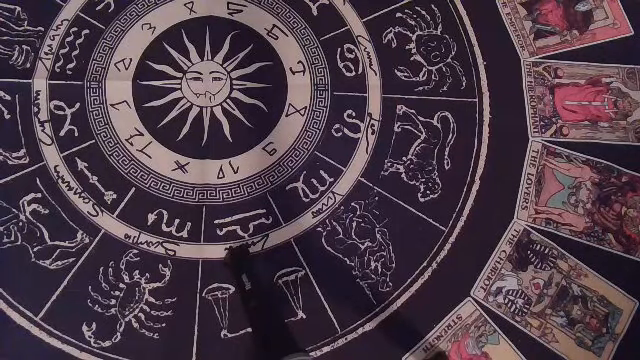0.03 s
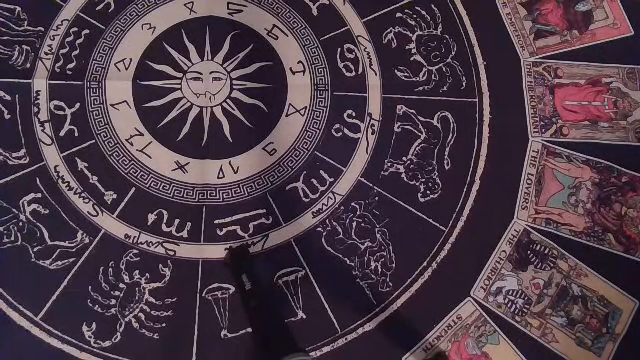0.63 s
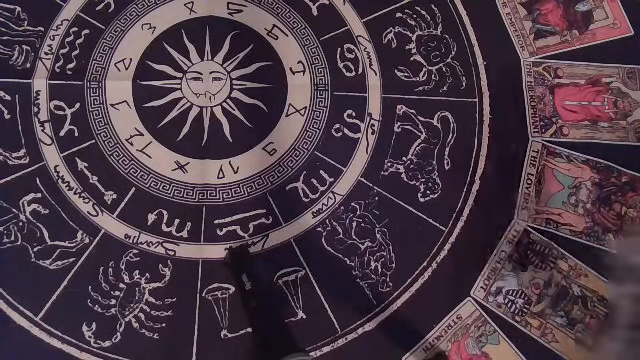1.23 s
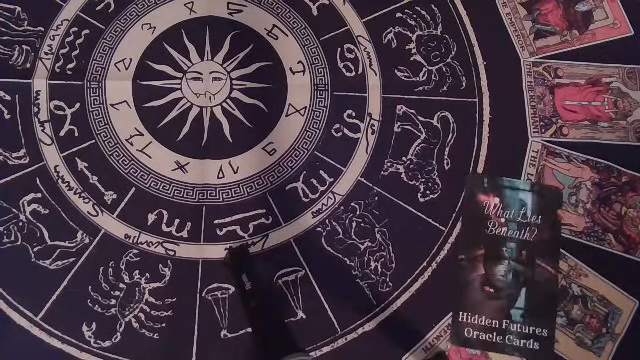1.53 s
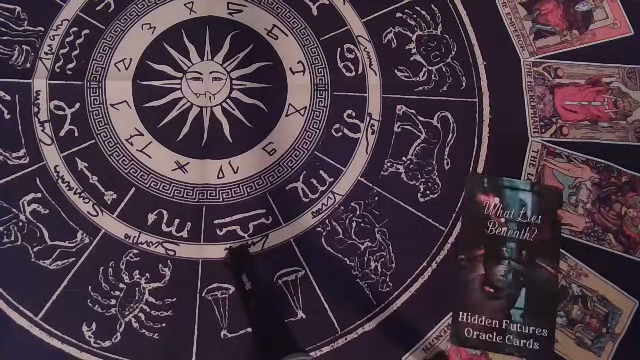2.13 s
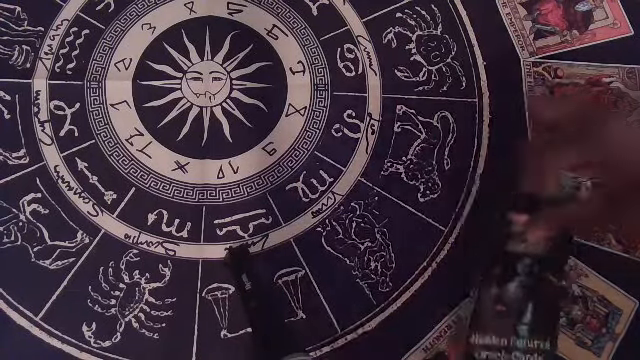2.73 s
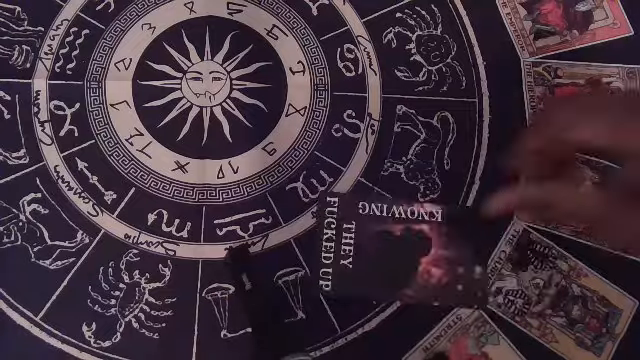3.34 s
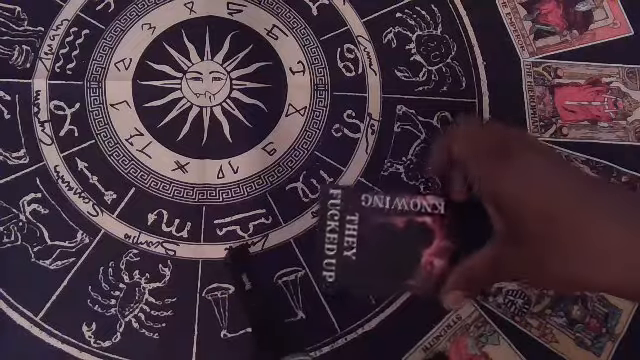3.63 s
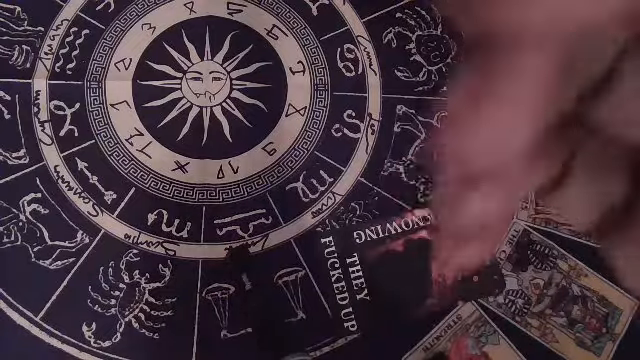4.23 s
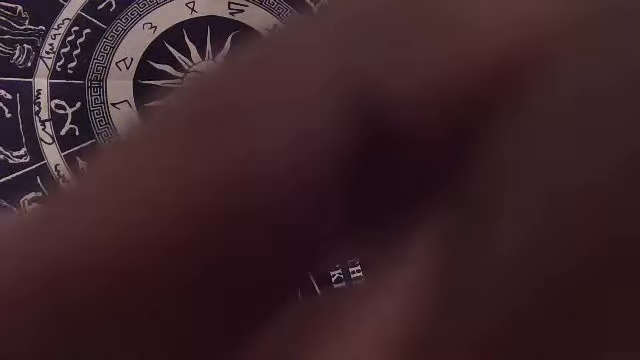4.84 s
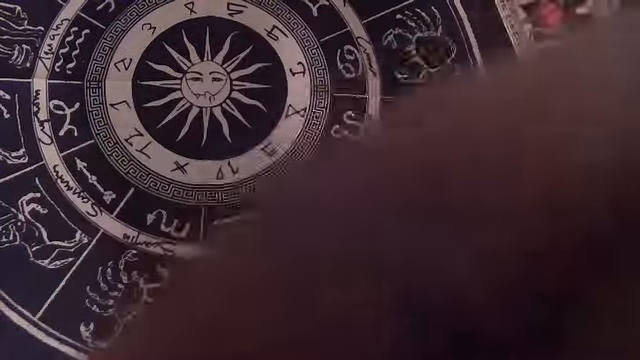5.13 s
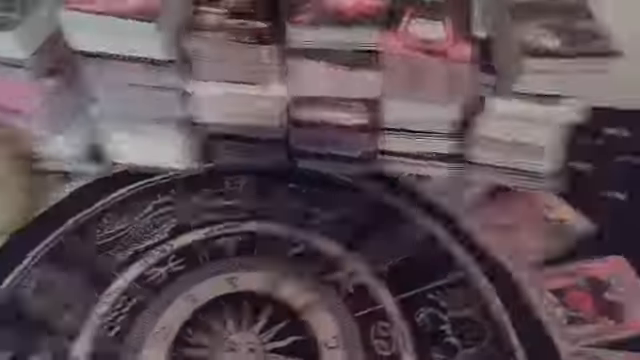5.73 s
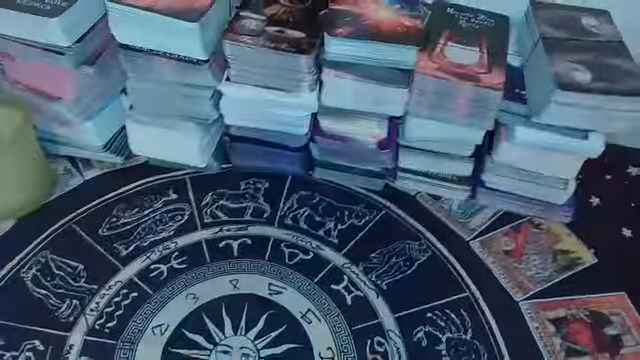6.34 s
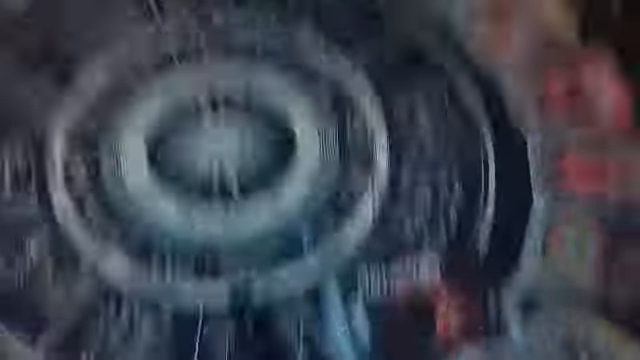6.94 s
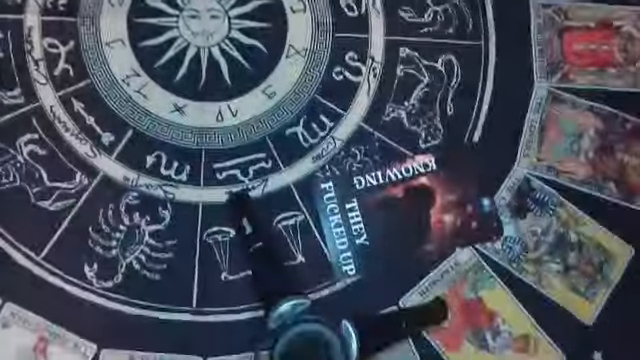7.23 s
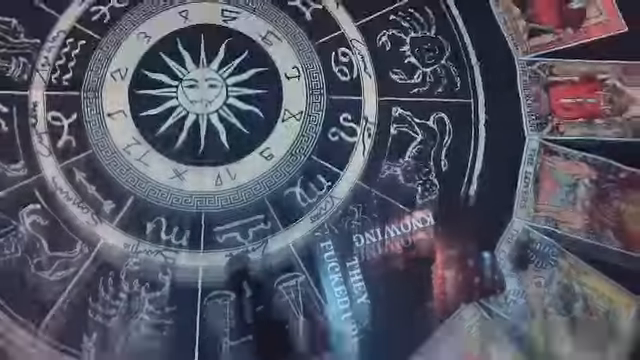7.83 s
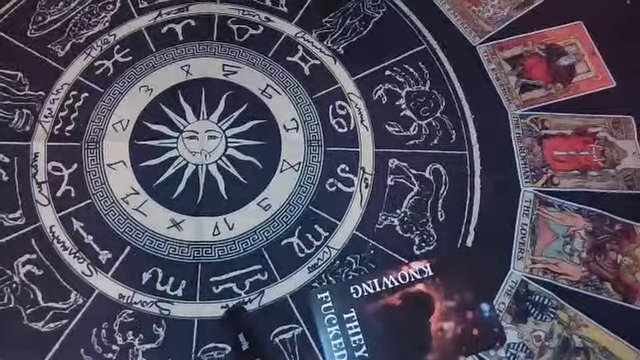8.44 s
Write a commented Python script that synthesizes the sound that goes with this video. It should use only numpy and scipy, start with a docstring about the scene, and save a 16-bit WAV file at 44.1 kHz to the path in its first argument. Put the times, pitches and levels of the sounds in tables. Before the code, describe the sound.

In a small, quiet room with a faint hum, a deck of cards is shuffled in four light strokes and set down, and a card is softly drawn and laid on a cloth-covered table. Then fingers rub right at the microphone as its stand is tilted. A heavy knock briefly overloads the sound, a lamp button clicks twice, and the metal arm swings with a run of loud, ringing knocks.

```python
"""A stand holding microphone and lamp is tilted, its lamp button clicked and its arm swung back. Fingers
rub and joints knock right at the microphone, through its housing, hard enough to overload the
preamplifier, which jams for a moment at the first heavy blow. Before that, at a cloth-covered table,
a deck of cards is shuffled in four strokes and set down, and one card is drawn and laid down.
One microphone hears it all, in a small, quiet room that hums behind."""
import sys
import numpy as np
from scipy import signal
from scipy.fft import rfft, irfft, next_fast_len
from scipy.io import wavfile

SR = 44100
rng = np.random.default_rng(int(sys.argv[2]) if len(sys.argv) > 2 else 0)


def output_pcm(signal):
    """Save a mono or channel-first signal as 16-bit PCM at the path in sys.argv[1].

    Samples are clipped to [-1, 1] before scaling.
    """
    pcm = np.clip(np.atleast_2d(signal).T, -1, 1) * 32767
    wavfile.write(sys.argv[1], SR, np.round(pcm).astype(np.int16))


N = 374449
TIME = np.arange(N) / SR


# the microphone housing's resonances, a list each for ring, thud and tick: pitch_hz, width_hz, gain_db
HOUSING_MODES = ([(1242, 147, 1.5), (1507.5, 190, 0), (1036, 180, -12), (1753, 120, -10), (2239, 280, -13)],
                 [(66, 52, -7), (165, 150, -2.5), (430, 170, 1.5), (585, 205, 2), (872, 61, -2)],
                 [(4200, 840, -0.5), (5500, 520, 3.5), (7370, 930, 2.5), (10500, 2000, -16.5),
                 (14000, 2000, -17)])
def stand():
    """Handling reaches the capsule through the housing and leaves the metal arm ringing."""
    contacts = stand_contacts()
    knocks = blows(contacts, HOUSING_MODES, chatter=.059, scuff=.6, chatter_s=.0018,
                   hard_hz=3800, detune=.036, vary_db=2.5)
    button = lamp_button()
    rubs = finger_rubs()
    ring = arm_ring(contacts)
    # rubbing sets the arm singing too
    singing = resonate(rubs, [(1520, 9, -5), (1260, 14, -13), (571, 10, -7)], detune=.002, vary_db=1)
    direct = knocks + button + from_db(-1) * rubs + singing
    reflections = from_db(-33) * room(direct, low_t60=.3, high_t60=.25, high_db=-3)
    return direct + ring + arm_ring_through_jam() + reflections


# the joints knocking, right at the microphone, and at 6.27 s a finger touching the lamp's button: start_s,
# ring_db, thud_db, tick_db
JOINT_KNOCKS = [(4.8456, -33, -60, -55), (5.5482, -16.5, -29.5, -55), (5.572, -17.5, -47, -60),
                (5.6049, 11, -15, 5.5), (5.6994, -28.5, -46, -41), (6.054, -21, -36, -33),
                (6.0965, -19, -24.5, -27.5), (6.1692, -29, -45, -68), (6.2718, -35, -45, -40.5),
                (6.6273, -12, -43, -26), (6.6353, -5.5, -20, -4), (6.6478, 6.5, -17, -8),
                (6.6604, -9, -23, -32), (6.6853, .5, -5, -17.5), (6.71, -7.5, -30, -23),
                (6.7287, -7.5, -11.5, -40), (6.7582, -2, -10, -25), (6.7687, -3.5, -10, -27),
                (6.8203, -20.5, -28.5, -20.5), (6.9474, -21.5, -19.5, -43), (6.9887, 3, -8, -15),
                (7.1083, 10.5, -18, -9.5), (7.1162, 7.5, -4.5, -9), (7.1448, -7.5, -42, -18.5),
                (7.1576, -17, -35, -25), (7.245, -13.5, -32, -24), (7.2578, -11, -43, -20),
                (7.2905, -17, -29, -46), (7.3753, -30, -35, -36), (7.4262, -30, -34, -36.5),
                (7.4484, -9, -28.5, -21.5), (7.558, -7, -17.5, -45), (7.6435, -17.5, -40, -30.5),
                (7.7259, -18, -24, -66), (7.7887, -27, -28, -70), (7.809, -3, -13, -36),
                (8.1505, -38, -52, -75), (8.2512, -34.5, -51, -59), (8.397, -28, -32, -57.5)]
SWING_START_S, SWING_FASTEST_S, SWING_END_S = 6.62, 7.15, 8.45
FIRM_DB, TOUCH_LEAD_S, HEAVY_DB, REBOUND_S = -17.2, .011, -5, .0028
HOUSING_RING_HZ, HARDNESS_OCTAVES_PER_DB, GRIPPED_UNTIL_S, GRIP_OCTAVES = 1510, .0053, 6.5, -.18
def stand_contacts():
    """Every blow on the stand: start_s, ring_db, thud_db, tick_db, pitch_hz."""
    # while the arm swings, its slack closes with a light touch just before each firm knock
    touches = [(s - TOUCH_LEAD_S, -30, -35, -45) for s, ring, *_ in JOINT_KNOCKS
               if ring > FIRM_DB and s - TOUCH_LEAD_S > SWING_START_S]
    # a heavy knock takes up the play of the joint and strikes again, more softly
    rebounds = [(s + REBOUND_S, ring - 2, thud, tick - 4) for s, ring, thud, tick in JOINT_KNOCKS
                if ring > HEAVY_DB]
    # as the arm starts to move, a looser part clanks twice at a lower pitch
    contacts = [(6.6387, -3.5, -17, -33, 890), (6.6507, -2.5, -11, -34, 890)]
    hits = list(JOINT_KNOCKS) + touches + rebounds + chatter_to_stop() + bumps_and_ticks()
    for s, ring, thud, tick in hits:
        # a harder contact rings higher; a gripping hand lowers the ring
        octaves = HARDNESS_OCTAVES_PER_DB * (tick - ring) + GRIP_OCTAVES * (s < GRIPPED_UNTIL_S)
        contacts.append((s, ring, thud, tick, HOUSING_RING_HZ * 2 ** octaves))
    return contacts


def chatter_to_stop(start_s=7.8144, count=6, first_gap_s=.005, slowing=1.2, loss_db=2.4):
    """The arm chatters to a stop, each blow later and weaker."""
    first_blow = np.array([3, -17, -5.5])   # ring_db, thud_db, tick_db
    k = np.arange(count)
    times = start_s + np.cumsum(first_gap_s * slowing ** (k - 1) * (k > 0))
    return [(s, *(first_blow - loss_db * i)) for i, s in enumerate(times)]


# finger bumps (first row), then joint ticks: start_s, end_s, hits_per_s, ring_db, thud_db, tick_db
BUMP_AND_TICK_SPELLS = [(5.46, 5.51, 50, -33, -42, -62), (6.65, 6.73, 60, -19, -27, -35),
                        (6.92, 7.28, 16, -30, -35, -48), (7.58, 7.62, 50, -29, -33, -49)]
def bumps_and_ticks(spread_db=2):
    """Soft finger bumps on the stand, then faint joint ticks while the arm swings."""
    hits = []
    for start, end, per_s, *levels in BUMP_AND_TICK_SPELLS:
        for s in np.arange(start, end, 1 / per_s):
            hits.append((s + rng.random() / per_s, *(levels + spread_db * rng.standard_normal(3))))
    return hits


# resonances of the arm that carries the microphone: pitch_hz, t60_s, gain_db
ARM_MODES = [(42, .25, -42), (73.4, .15, -43), (118, .15, -43.5), (225, .12, -48), (375, .3, -56),
             (571, .6, -50.5), (676, .6, -62), (1085, .45, -56.5), (1265, .13, -34), (1460, .25, -51),
             (1530, .38, -52.5), (1744, .35, -60), (1870, .45, -61), (2487, .35, -66), (3270, .2, -64)]
def arm_ring(contacts, spread_db=3.4):
    """Each jolt leaves the metal arm swaying with a faint, long ring."""
    start_s, ring_db = np.transpose(contacts)[:2]
    onsets = (start_s * SR).astype(int)
    t, ring = TIME[:SR // 2], np.zeros(N)
    for hz, t60, db in ARM_MODES:
        jolts = np.zeros(N)
        jolts[onsets] = from_db(ring_db + db + spread_db * rng.standard_normal(len(onsets)))
        mode = from_db(-60 * t / t60) * np.sin(2 * np.pi * hz * t)
        ring += signal.oaconvolve(jolts, mode)[:N]
    return ring


def arm_ring_through_jam(start_s=5.6994):
    """The arm's ring from the first heavy blow sounds through as the jammed preamplifier briefly frees."""
    modes = [(1250, .2, -45), (3330, .35, -50), (6100, .2, -65)]   # pitch_hz, t60_s, level_db
    t = np.maximum(TIME - start_s, 0)
    return sum(from_db(db - 60 * np.minimum(t / t60, 3)) * np.sin(2 * np.pi * hz * t)
               for hz, t60, db in modes)


# fingers on the table, then on the microphone's stand: start_s, length_s, body_gain_db, hiss_gain_db
FINGER_STROKES = [(3.44, .045, -57, -82), (3.515, .04, -59, -82), (3.73, .055, -57, -82),
                  (4.556, .065, -43.5, -51.5), (4.645, .03, -45, -40), (4.858, .07, -43.5, -53.5),
                  (4.97, .045, -49, -58), (5.09, .033, -43, -43.5), (5.153, .06, -32, -33.5),
                  (5.173, .022, -23.5, -34), (5.256, .045, -38, -39.5), (5.345, .062, -37.5, -46.5),
                  (5.36, .24, -44.5, -68), (5.444, .036, -29.5, -37.5), (5.97, .08, -46.5, -62),
                  (6.05, .035, -35.5, -37.5), (6.06, .11, -37, -43), (6.62, .06, -18.5, -37.5),
                  (6.68, .12, -36, -42), (6.8, .135, -35, -45), (7.28, .07, -39.5, -52),
                  (7.535, .1, -44.5, -53), (7.89, .125, -41, -56.5), (8.25, .14, -55, -62.5)]
# the rubbing's low body and its high hiss: frequency_hz, gain_db
RUB_BODY_SPECTRUM = [(80, -19), (280, -24), (520, -12), (820, -18.5), (1050, -6.5), (1250, 1.5), (1520, -1),
                     (1900, -11), (2250, -14), (2900, -24.5), (4200, -42)]
RUB_HISS_SPECTRUM = [(2300, -26.5), (3300, -8.5), (4700, -12), (5800, 1.5), (7300, 2), (8800, -9.5),
                     (10300, -13), (12000, -17.5), (16000, -20.5)]
# narrow resonances that sing out under the fingers: pitch_hz, width_hz, gain_db
RUB_RESONANCES = [(1250, 110, 1), (1520, 70, 4.5), (2170, 76, 6), (2780, 85, 2), (3460, 210, 3.5),
                  (4160, 220, 5), (5300, 150, 6.5), (6930, 260, 7), (7560, 200, 4.5), (10700, 140, 3.5)]
def finger_rubs(drag_body_db=-53.5, drag_hiss_db=-65):
    """Fingers stick and slip in short strokes, and the joint drags all through the swing."""
    joint_drag = (SWING_START_S, SWING_FASTEST_S, SWING_END_S, drag_body_db, drag_hiss_db)
    strokes = swells(FINGER_STROKES, attack=.33) + [joint_drag]
    return friction(strokes, RUB_BODY_SPECTRUM, RUB_HISS_SPECTRUM, RUB_RESONANCES,
                    slips_per_s=2800, grain_db=3, smooth=.7, flutter_db=1.46, swell=2)


# the lamp's button, on the same stand as the microphone: start_s, ring_db, thud_db, tick_db
LAMP_CLICKS = [(6.1238, -12, -17.5, -17), (6.2998, -6.5, -19, -14.5)]
# its resonances, a list each for ring, thud and tick: pitch_hz, width_hz, gain_db
BUTTON_MODES = ([(1650, 64, 0), (985, 56, -1.5), (1300, 240, -6.5), (2192, 110, -11.5),
                (2835, 51.6, -24.5)], [(345, 260, -4), (521, 220, -2), (680, 85, -1.5)], [(4000, 380, -5),
                (5170, 400, -1), (7050, 330, 1.5), (10700, 1500, -30)])
def lamp_button():
    """The button snaps twice, short and hard."""
    return blows(LAMP_CLICKS, BUTTON_MODES, chatter=.072, scuff=.58, chatter_s=.00089,
                 hard_hz=4014, detune=.006, vary_db=1)


def cards():
    """Cards in the air and on the table, off the microphone, with more of the room around them."""
    packet_rubs, packet_taps = shuffling()
    shuffle = card_slides(packet_rubs) + from_db(.5) * card_taps(packet_taps)
    table = table_taps()
    boom = lowpass(table, 750, order=2)   # the tabletop radiates mostly its lows
    into_room = from_db(-7) * (shuffle + boom) + from_db(-17) * table
    return shuffle + table + room(into_room, low_t60=.36, high_t60=.35, high_db=-.5)


# four shuffle strokes above the table: lift_s, catch_s, land_s, catch_db, land_db
SHUFFLE_STROKES = [(-.06, .0092, .0536, -37, -31), (.268, .3331, .3835, -30, -33.5),
                   (.5967, .6245, .7205, -46, -31.5), (.9467, .9807, 1.0517, -33, -37.5)]
def shuffling(lift_rub_s=.025, release_s=.028, flat_delay_s=.005):
    """A packet is lifted, its edge catches the deck, it slides home and lands."""
    rubs = []   # start_s, fastest_s, end_s, body_gain_db, hiss_gain_db
    taps = []   # start_s, ring_gain_db, thud_gain_db, tick_gain_db
    for lift, catch, land, catch_db, land_db in SHUFFLE_STROKES:
        rubs += [(lift - lift_rub_s, lift, lift + lift_rub_s, -55.5, -58),
                 ((lift + catch) / 2, land, land + release_s, -49.5, -57)]
        taps += [(lift, -45, -47, -47),
                 (catch, catch_db, catch_db - 12, catch_db - 17),
                 (land, land_db - 1, land_db - 4, land_db - 13),   # edge first, then flat
                 (land + flat_delay_s, land_db - 6, land_db + 1.5, land_db - 3.5)]
    return rubs, [tap for tap in taps if tap[0] >= 0]


# single cards sliding off the deck at the table: start_s, length_s, body_db, hiss_db
CARD_STROKES = [(1.22, .08, -56, -58), (1.58, .13, -60.5, -65.5), (1.83, .08, -65, -62),
                (2.595, .08, -61, -68), (2.775, .12, -54.5, -71)]
# the sliding's low body and its high hiss: frequency_hz, gain_db
CARD_BODY_SPECTRUM = [(80, -1), (200, -16), (350, -7), (650, -14), (900, -20.5), (1350, -12.5), (1650, -5),
                      (1950, -12.5), (2500, -18), (3200, -30.5), (4500, -50)]
CARD_HISS_SPECTRUM = [(2500, -20), (3500, 4), (4400, -11), (5500, 2), (7300, 4), (9000, -9), (10800, 1.5),
                      (12500, -11), (16000, -2.5)]
# narrow resonances of the sliding cards: pitch_hz, width_hz, gain_db
CARD_RESONANCES = [(1600, 110, 4.1), (1980, 160, 1.7), (5250, 280, 3), (7000, 330, 2)]
def card_slides(packet_rubs):
    """Card slips over card with a fine, papery grain."""
    strokes = packet_rubs + swells(CARD_STROKES, attack=.42)
    return friction(strokes, CARD_BODY_SPECTRUM, CARD_HISS_SPECTRUM, CARD_RESONANCES,
                    slips_per_s=3000, grain_db=2, smooth=.58, flutter_db=1.7, swell=.99)


# the deck knocked square: start_s, ring_gain_db, thud_gain_db, tick_gain_db
SQUARING_TAP = [(1.2409, -40, -45, -38.5)]
# the deck's resonances, a list each for ring, thud and tick: pitch_hz, width_hz, gain_db
DECK_MODES = ([(1626, 184, 5), (1920, 300, 7), (1120, 250, -5.5), (2600, 600, -16.5)], [(170, 122, -6),
              (358, 107, -1.5), (530, 110, -0.5), (654, 110, -6)], [(3370, 510, 0), (5560, 900, 1.5),
              (7400, 1400, -2), (10700, 1000, -6), (13900, 3000, -10)])
def card_taps(packet_taps):
    """Packets strike the deck, which rings briefly and is then knocked square."""
    return blows(packet_taps + list(SQUARING_TAP), DECK_MODES, chatter=.14, scuff=.4, chatter_s=.002,
                 hard_hz=3070, detune=.039, vary_db=2.5)


# deck and fingers touching the table: start_s, ring_db, thud_db, tick_db
TABLE_TOUCHES = [(1.3204, -29, -35, -47), (1.3318, -37, -46, -35.5), (1.3357, -24, -28.5, -68),
                 (2.9855, -37, -39, -63), (2.9907, -40, -47.5, -72), (3.039, -45.5, -49, -50.5),
                 (3.0795, -45, -57, -48), (3.4514, -49, -57, -77), (3.7548, -45, -54.5, -77)]
# the tabletop's resonances, a list each for ring, thud and tick: pitch_hz, width_hz, gain_db
TABLE_MODES = ([(1123, 120, -1), (1310, 94, 3.5), (1520, 190, -5), (2020, 460, -15)], [(145, 88, -11.5),
               (272, 82, -4.5), (424, 30, 0.5), (580, 70, -6)], [(2330, 910, -3), (3500, 600, -7),
               (5560, 1000, -19), (7250, 1200, -18.5)])
def table_taps():
    """Light blows reach the tabletop through the muffling cloth."""
    return blows(TABLE_TOUCHES, TABLE_MODES, chatter=.092, scuff=.4, chatter_s=.0042,
                 hard_hz=2800, detune=.015, vary_db=2)


def blows(rows, body, chatter, scuff, chatter_s, hard_hz, detune, vary_db):
    """A cushioned push makes a body ring and thud; a dry scuff of the surfaces makes it tick."""
    out, t = np.zeros(N), TIME[:SR // 12]
    ring_modes, thud_modes, tick_modes = body
    ring_hz = np.mean([hz for hz, width, db in ring_modes[:2]])
    click = (t == 0) + 1e-18
    for s, ring_db, thud_db, tick_db, *pitch in rows:
        grit = rng.standard_normal(len(t)) * np.exp(-t / chatter_s)
        # a contact that hardly ticks is a soft one, and its push is dull
        cushion_hz = np.clip(hard_hz * 2 ** ((tick_db - ring_db) / 36), 1600, SR / 4)
        push = lowpass(click + chatter * grit, cushion_hz, order=4)
        grip = pitch[0] / ring_hz if pitch else 1   # where and how it is held shifts the ring
        held_modes = [(hz * grip, width, db) for hz, width, db in ring_modes]
        at = int(s * SR)
        for force, modes, db in [(push, held_modes, ring_db), (push, thud_modes, thud_db),
                                 (click + scuff * grit, tick_modes, tick_db)]:
            part = resonate(force, modes, detune, vary_db)
            out[at:at + len(t)] += (from_db(db) * part / np.abs(part).max())[:N - at]
    return out


def resonate(force, modes, detune, vary_db):
    """Parallel resonances; the place of contact shifts their pitch and strength."""
    out = np.zeros(len(force))
    for k, (hz, width, db) in enumerate(modes):
        radius = np.exp(-np.pi * width / SR)
        angle = 2 * np.pi * hz * (1 + detune * rng.standard_normal()) / SR
        gain = (-1) ** k * from_db(db + vary_db * rng.standard_normal()) * (1 - radius ** 2) / 2
        out += gain * signal.lfilter([1, 0, -1], [1, -2 * radius * np.cos(angle), radius ** 2], force)
    return out


def friction(strokes, body, hiss, peaks, slips_per_s, grain_db, smooth, flutter_db, swell):
    """Tiny slips of uneven size, swelling and fading under each stroke."""
    sizes = from_db(grain_db * np.minimum(rng.exponential(1, N), 4)) * rng.choice([-1, 1], N)
    slips = rms_one(sizes * (rng.random(N) < slips_per_s / SR)) + smooth * rng.standard_normal(N)
    slips *= from_db(flutter_db * drift(120))   # the pressure is never steady
    body_power, hiss_power = np.zeros(N), np.zeros(N)
    for start, peak, end, body_db, hiss_db in strokes:
        envelope = np.interp(TIME, [start, peak, end], [0, 1, 0]) ** swell
        body_power += envelope * from_db(body_db) ** 2
        hiss_power += envelope * from_db(hiss_db) ** 2
    return (np.sqrt(body_power) * coloured(slips, body, peaks)
            + np.sqrt(hiss_power) * coloured(slips, hiss, peaks))


def swells(rows, attack):
    """Each stroke speeds up for the attack share of its length, then slows down."""
    return [(s, s + attack * length, s + length, *levels) for s, length, *levels in rows]


def room(x, low_t60, high_t60, high_db, build_s=.0079):
    """Diffuse reflections of a small furnished room; the treble dies first."""
    t = TIME[:SR // 2]
    noise = rng.standard_normal(len(t))
    low = lowpass(noise, 2000, order=2)
    low_decay, high_decay = from_db(-60 * t / low_t60), from_db(-60 * t / high_t60)
    tail = low * low_decay + from_db(high_db) * (noise - low) * high_decay
    tail *= np.minimum(t / build_s, 1)
    return signal.fftconvolve(x, tail / np.linalg.norm(low_decay))[:N]


# the room's low hum: pitch_hz, level_db
HUM_TONES = [(54, -65.5), (146, -71)]
# a thin high hiss, and the room air around the microphone: frequency_hz, gain_db
THIN_HISS_SPECTRUM = [(12500, -25), (14100, 0.5), (15500, -25)]
AIR_SPECTRUM = [(20, -12), (60, 0), (98, -15.5), (158, -12.5), (300, -23), (560, -23), (873, -39),
                (1220, -30.5), (1610, -30), (1950, -38.5), (3500, -45), (7000, -45), (12500, -48.5),
                (16000, -49.5)]
# the thin hiss fading away: time_s, level_db
THIN_HISS_FADE = [(0, -82), (5.3, -82), (5.7, -100)]
def room_tone(air_db=-54):
    """Steady room air with a wavering low hum and a thin high hiss."""
    hum = np.zeros(N)
    for hz, db in HUM_TONES:
        amplitude = np.sqrt(2) * from_db(db + 2.3 * drift(8.2))
        hum += amplitude * np.sin(2 * np.pi * hz * TIME + 1.1 * drift(11))
    hiss_db = np.interp(TIME, *np.transpose(THIN_HISS_FADE))
    hiss = from_db(hiss_db) * coloured(rng.standard_normal(N), THIN_HISS_SPECTRUM)
    air = from_db(air_db) * coloured(rng.standard_normal(N), AIR_SPECTRUM)
    return hum + hiss + air


def coloured(x, spectrum, peaks=()):
    """Give a signal a broad spectrum with narrow peaks on top; rms 1."""
    hz, db = np.transpose(spectrum)
    size = next_fast_len(N)
    f = np.maximum(np.fft.rfftfreq(size, 1 / SR), 1)
    level = np.interp(np.log(f), np.log(hz), db)
    for centre, width, height in peaks:
        level += height / (1 + (2 * (f - centre) / width) ** 2)
    gain = from_db(level) * np.minimum(1, f / hz[0]) * np.minimum(1, hz[-1] / f) ** 2
    return rms_one(irfft(rfft(x, size) * gain, size)[:N])


def drift(rate_hz):
    """A random wander; rms 1."""
    knots = rng.standard_normal(int(N / SR * rate_hz) + 2)
    return rms_one(np.interp(TIME * rate_hz, np.arange(len(knots)), knots))


def lowpass(x, cutoff_hz, order):
    """Roll off the treble."""
    return signal.sosfilt(signal.butter(order, cutoff_hz, fs=SR, output="sos"), x)


def from_db(db):
    """Decibels to gain."""
    return 10 ** (np.asarray(db) / 20)


def rms_one(x):
    """Scale to unit power."""
    return x / np.sqrt(np.mean(x ** 2) + 1e-20)


def scene():
    """Cards, stand and room at one microphone."""
    return (cards() + stand() + room_tone())[None]


def preamp_jam(start_s=5.6094, onset_s=.0014, high_s=.081, cross_s=.05, low_s=.15, recovery_s=.25):
    """The offset, in rails: it sticks at the upper, crosses over, sticks at the lower, creeps back."""
    t = TIME - start_s
    crossed = high_s + cross_s
    freed = crossed + low_s
    stuck = np.interp(t, [0, onset_s, high_s, crossed, (crossed + freed) / 2, freed],
                      [0, 4, 1, -1, -1.5, -1])
    return stuck * np.exp(-np.maximum(t - freed, 0) / recovery_s)


def record(dry, rail=.71, cutoff_hz=16300):
    """The preamplifier jams once and flattens all beyond its rails; the top treble is then cut."""
    clipped = np.clip(dry + rail * preamp_jam(), -rail, rail)
    return signal.fftconvolve(clipped, signal.firwin(161, cutoff_hz, fs=SR)[None], mode="same")


dry = scene()
out = record(dry)
output_pcm(out)
```